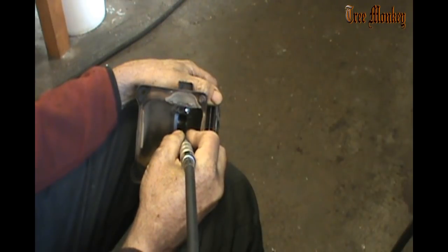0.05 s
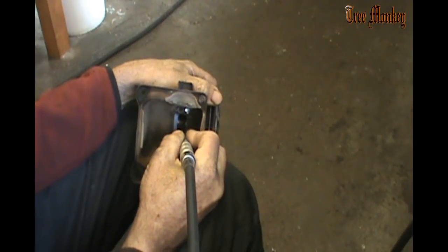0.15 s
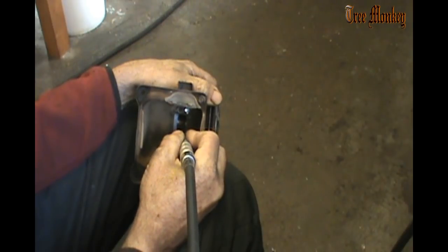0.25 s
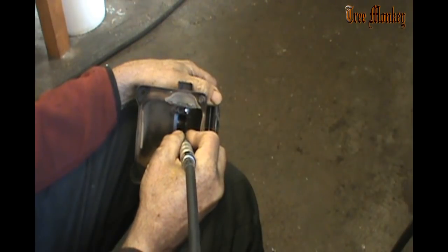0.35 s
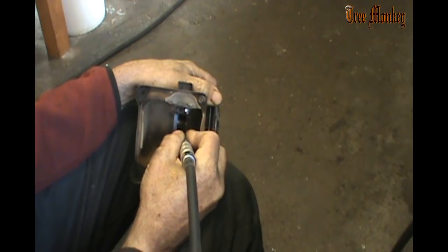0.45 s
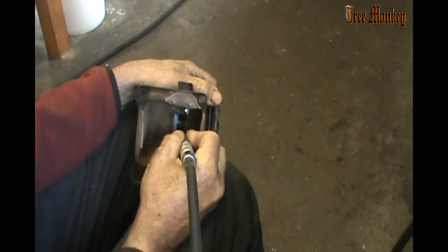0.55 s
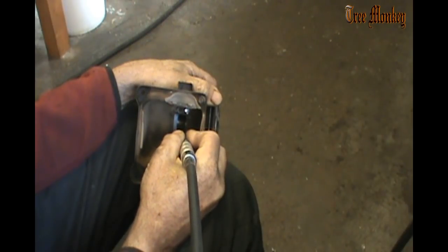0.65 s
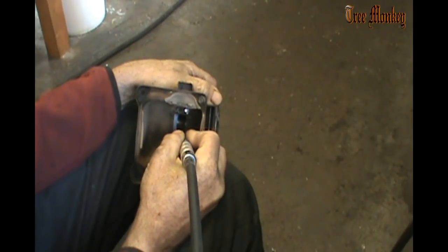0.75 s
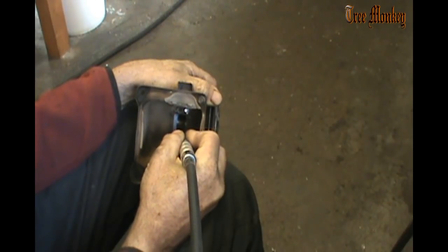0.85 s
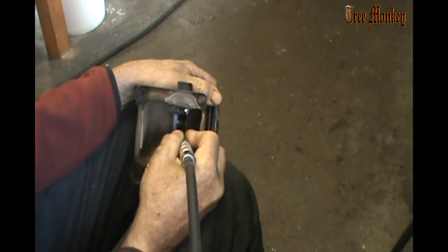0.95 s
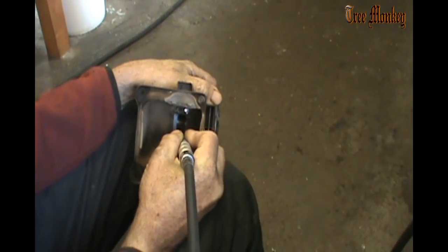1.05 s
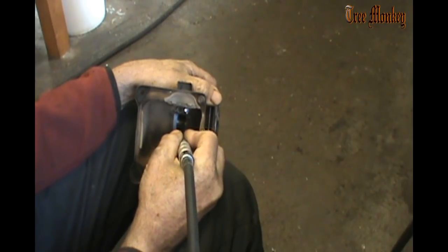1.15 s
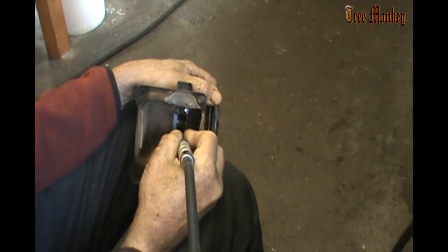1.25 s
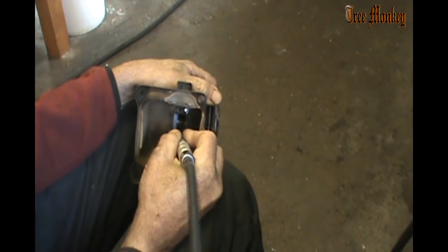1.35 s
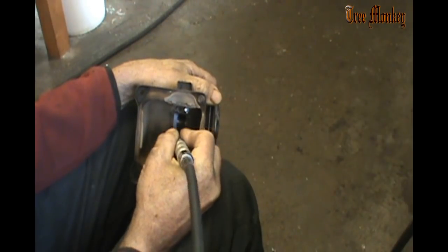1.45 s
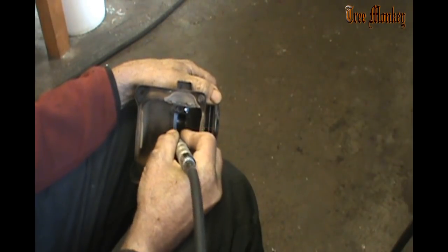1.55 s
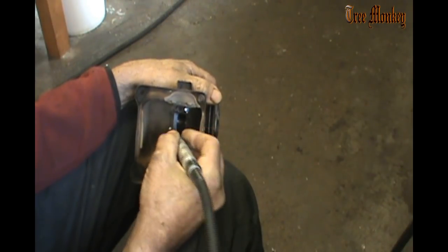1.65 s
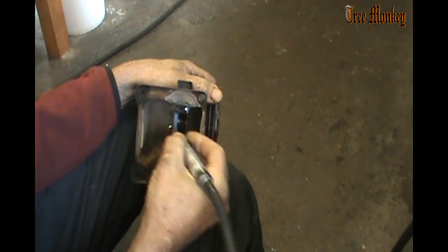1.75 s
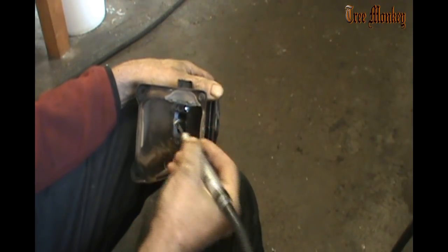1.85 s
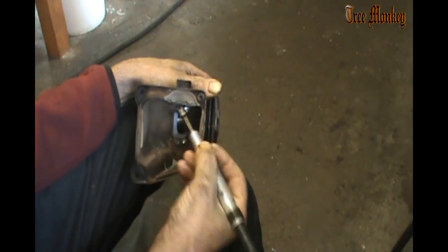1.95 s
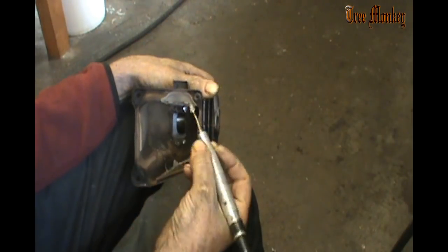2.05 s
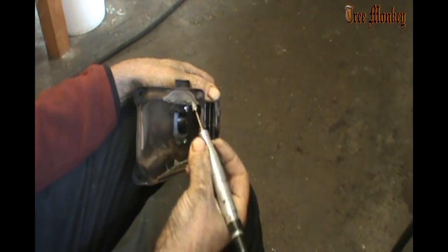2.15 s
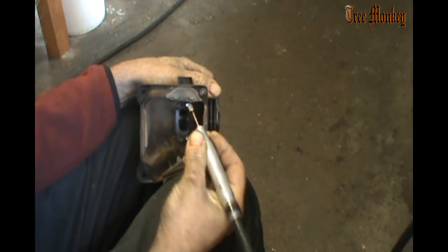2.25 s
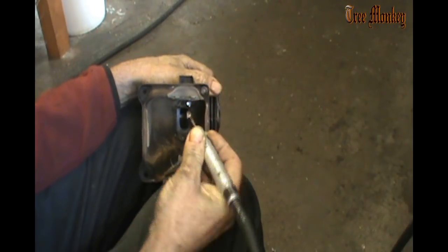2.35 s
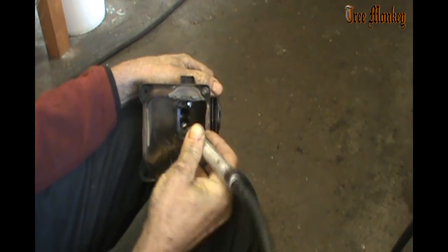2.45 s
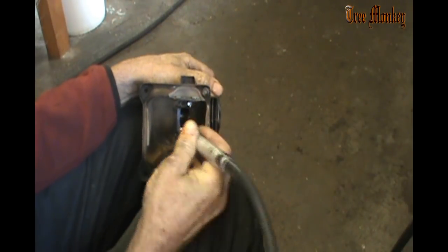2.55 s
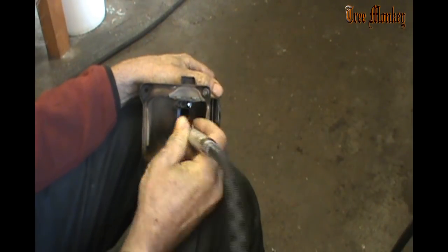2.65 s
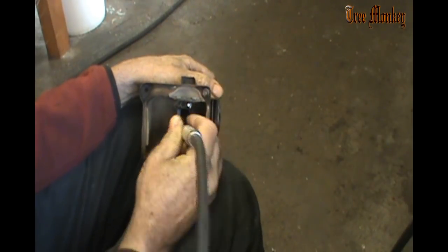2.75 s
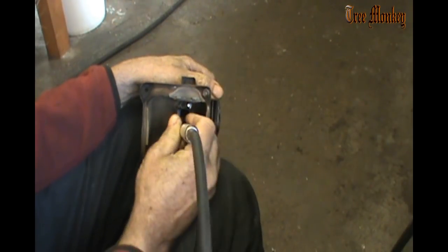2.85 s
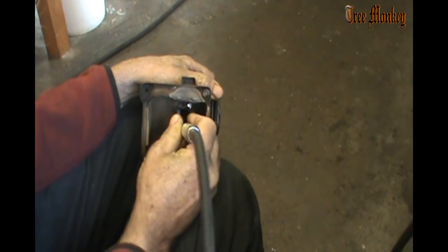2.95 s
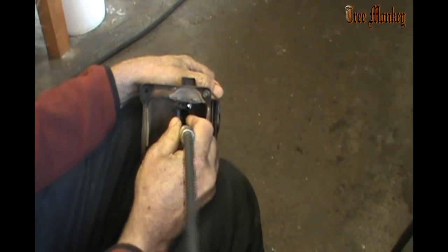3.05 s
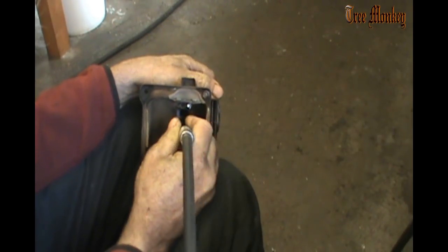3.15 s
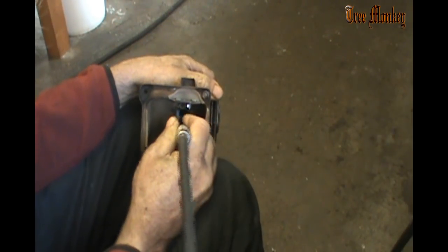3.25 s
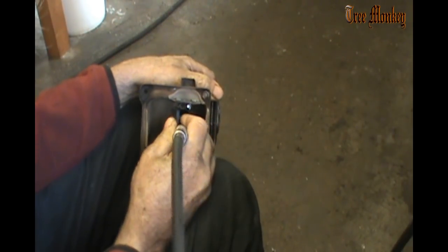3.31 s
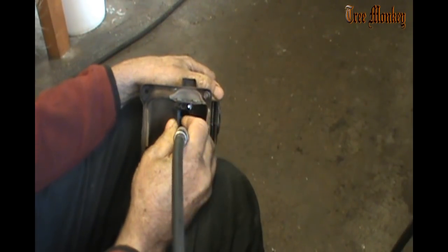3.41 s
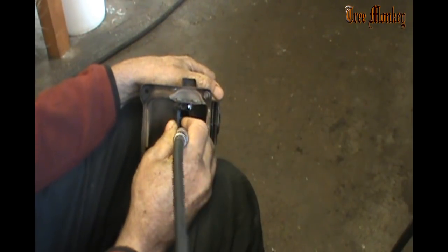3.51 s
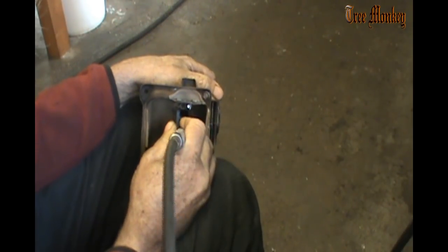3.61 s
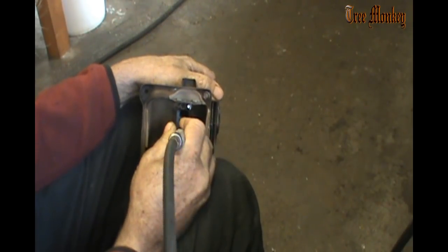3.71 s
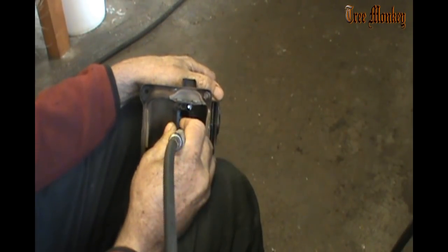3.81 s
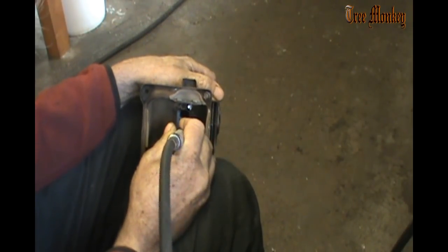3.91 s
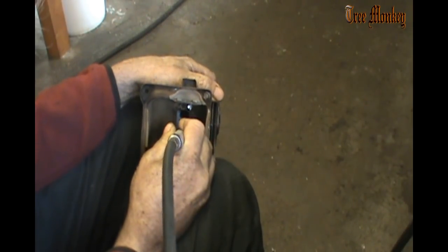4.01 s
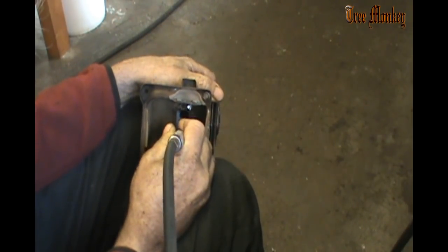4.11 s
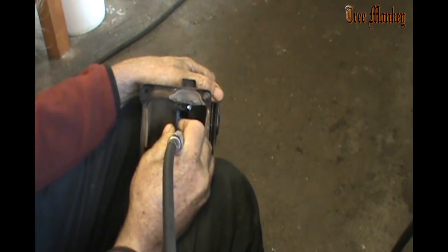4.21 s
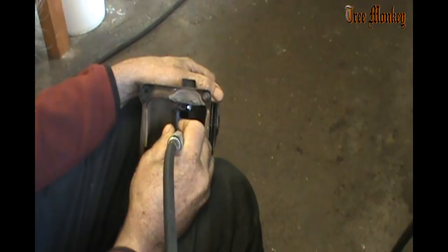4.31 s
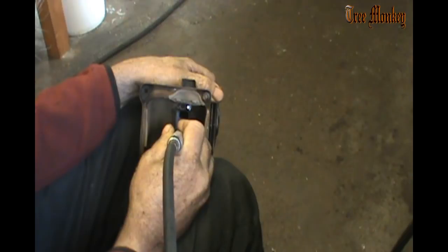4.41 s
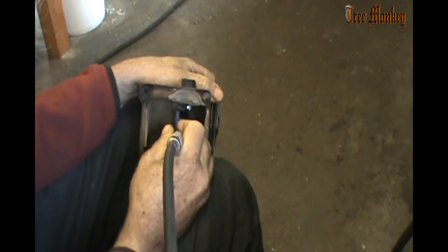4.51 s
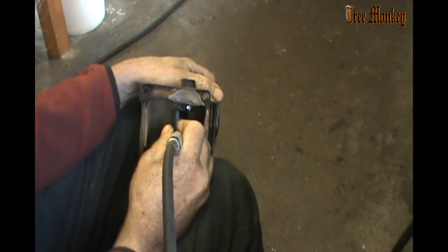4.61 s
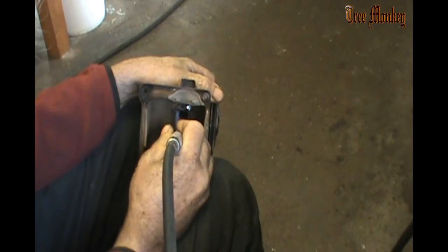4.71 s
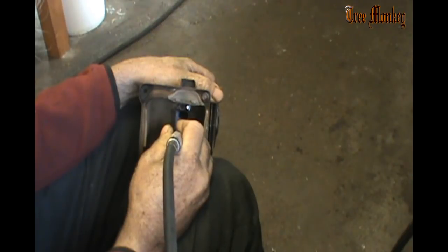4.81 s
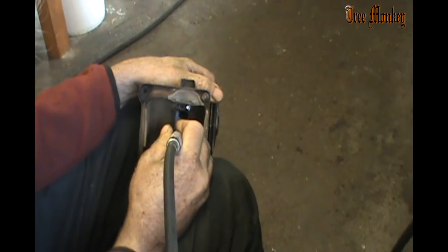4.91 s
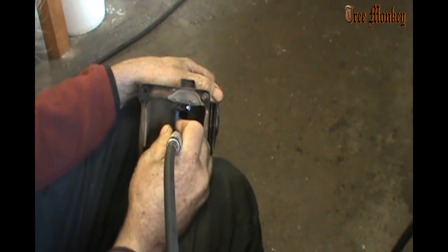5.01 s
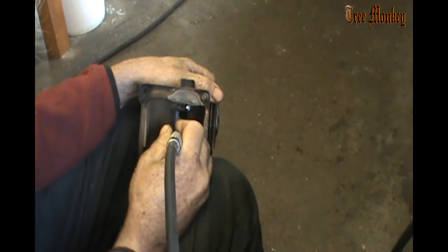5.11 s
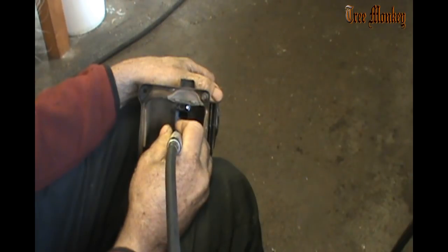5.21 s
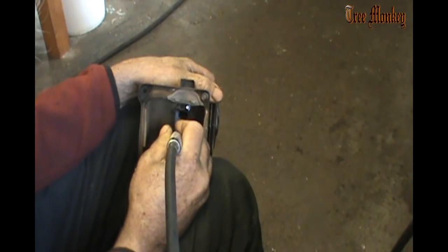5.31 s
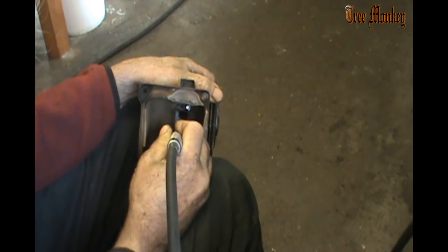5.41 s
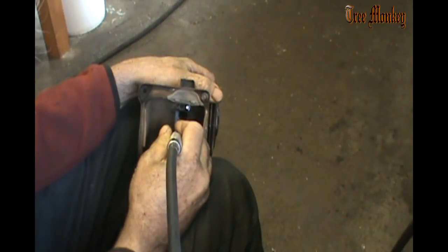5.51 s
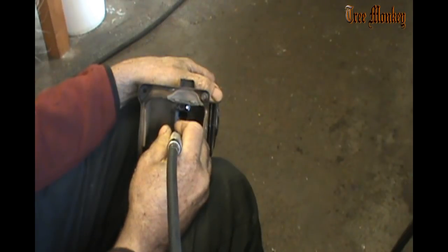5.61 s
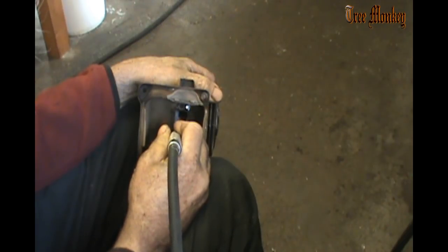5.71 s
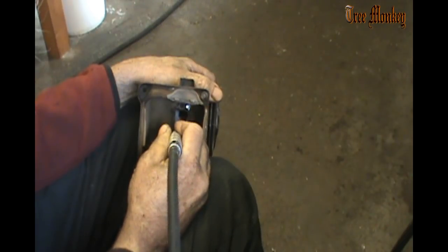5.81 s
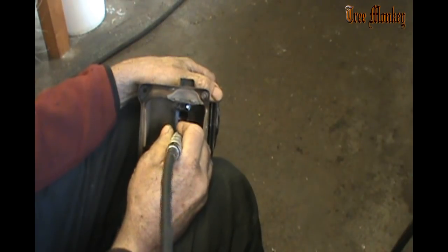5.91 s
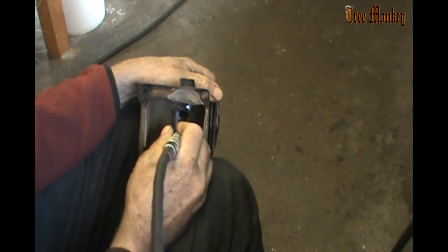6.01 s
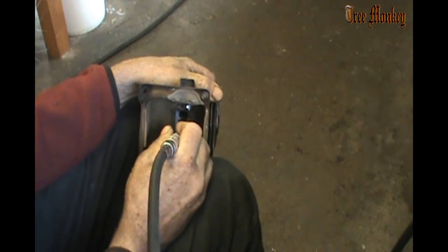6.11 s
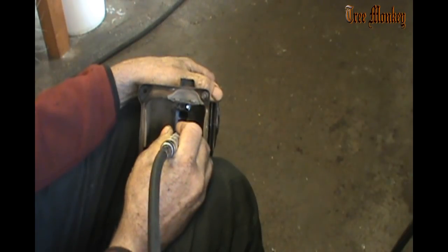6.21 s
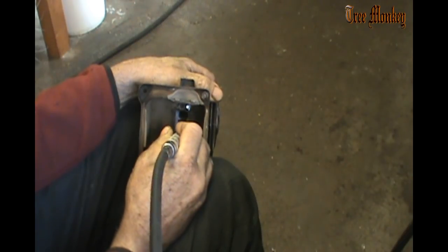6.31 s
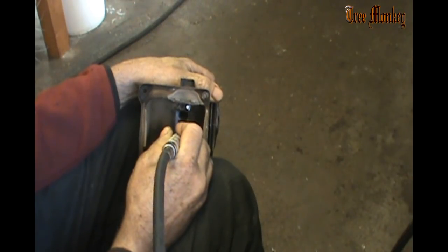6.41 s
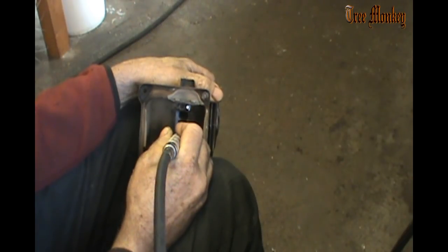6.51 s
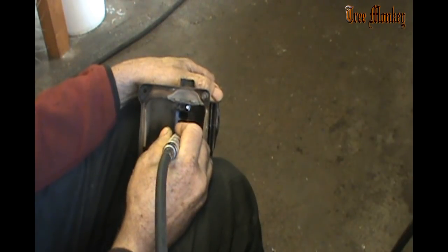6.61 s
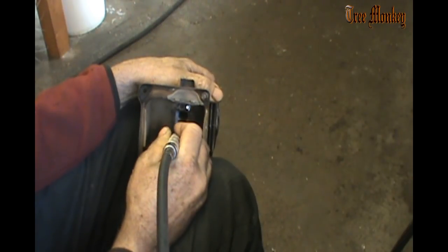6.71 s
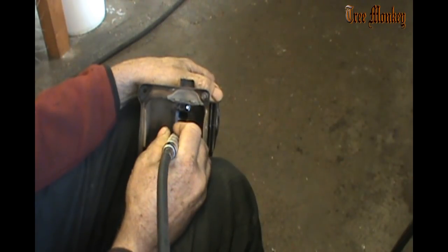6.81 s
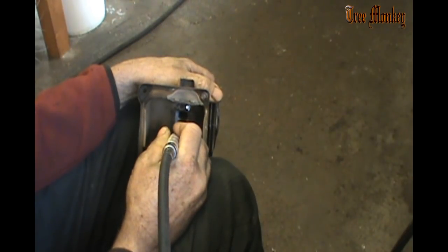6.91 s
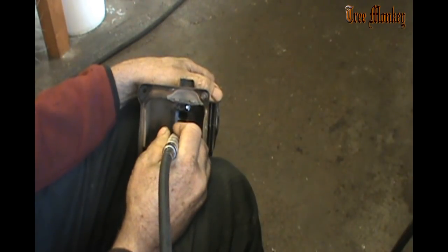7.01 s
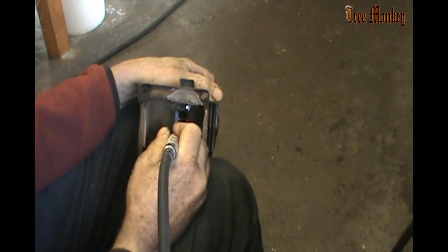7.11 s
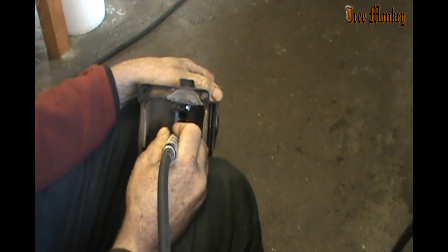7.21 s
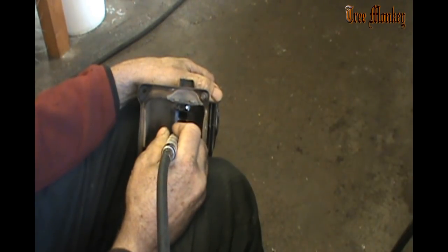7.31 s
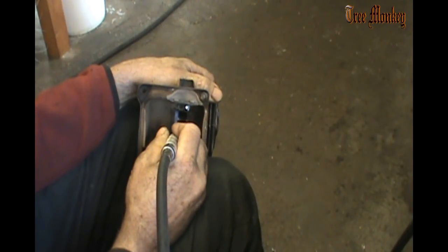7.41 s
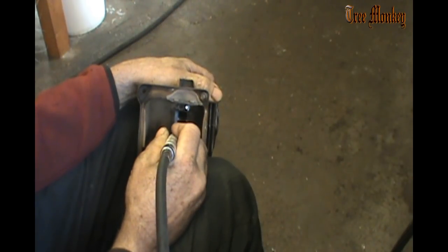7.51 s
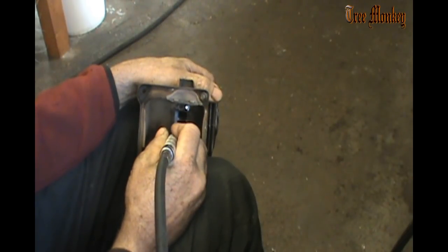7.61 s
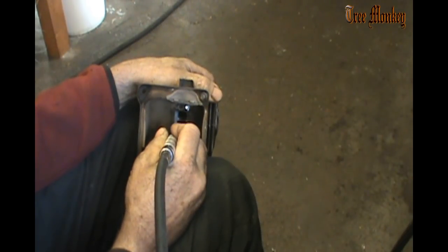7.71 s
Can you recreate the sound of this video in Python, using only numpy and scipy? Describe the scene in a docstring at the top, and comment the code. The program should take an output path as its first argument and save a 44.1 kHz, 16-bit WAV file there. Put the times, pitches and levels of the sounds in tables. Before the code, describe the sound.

A small high-speed grinder on a flexible shaft is already cutting steel, close by, with a shrill, gritty, ringing rasp. Beneath it the motor whirs and hums slightly to the right, its pitch barely wavering. The cut eases from about 0.8 seconds and stops around 1.6 seconds with a last light graze. The tool then runs free, with an airy hiss and a thin, high whine, slowly swelling as the recording level recovers. At 3.8 seconds the burr touches lightly, bites properly at about 4.2 and is harshest near 5, pushing the motor into the background. It lifts briefly at 5.8 seconds, leaving the whir and hiss, and touches again just before 6.2. From 6.6 it grinds hard and bright until the end, at nearly 8 seconds. The workshop adds only slight, short reflections.

```python
"""A pencil grinder on a flexible shaft cuts into steel: the burr's teeth tear off chips, and each impulse
sets workpiece and burr ringing. The motor whirs to the right and hums at harmonics of the shaft rate.
At 1.6 s the burr lifts; the handpiece hisses on, and an automatic gain control, which ducks everything
under a loud cut, lets the motor swell back. At 3.8 s the burr bites again, lifts briefly at 5.8 s,
then cuts to the end."""
import sys
import numpy as np
from scipy import signal
from scipy.fft import rfft, irfft
from scipy.io import wavfile
from scipy.ndimage import uniform_filter1d

SR = 44100
rng = np.random.default_rng(int(sys.argv[2]) if len(sys.argv) > 2 else 0)


def dump_mix(stems):
    """Bounce the given channels to the path in sys.argv[1] as a 16-bit WAV at rate SR."""
    frames = np.atleast_2d(stems).T  # one column per channel
    limited = np.clip(frames, -1, 1)  # hard clip at full scale
    pcm = np.round(limited * 32767).astype(np.int16)
    wavfile.write(sys.argv[1], SR, pcm)


N = 341768
TIME = np.arange(N) / SR
FREQS = np.maximum(np.arange(N // 2 + 1) * SR / N, 1)

# speed of the shaft: time_s, rate_hz
SHAFT_SPEED = [(0, 229.2), (0.9, 222.7), (1.25, 224.0), (1.95, 230.8), (2.25, 224.3), (2.5, 222.2),
               (2.8, 220.7), (3.05, 222.8), (3.75, 225.1), (4.13, 229.2), (5.05, 226.3), (5.8, 226.4),
               (6, 229.6), (6.3, 230.8), (6.75, 228.0), (7.35, 226.2), (7.75, 222.3)]
# the burr on the steel: touch_s, lift_s, tilt_db (burr over workpiece)
CONTACT_SPANS = [(-0.1, 1.527, 0), (1.538, 1.647, -4.5), (3.785, 5.835, 1.5), (6.153, 7.94, 0)]
# hand pressure, as the relative level of the cut: time_s, level_db
HAND_PRESSURE = [(0, -7), (0.8, -7), (1.38, -12), (1.5, -17), (1.55, -24), (1.66, -19.5), (3.82, -21.5),
                 (3.94, -24.5), (4.06, -19), (4.17, -9), (4.65, -8), (5.03, -2.5), (5.83, -10.5),
                 (6.19, -19), (6.38, -9.5), (6.55, -9.5), (6.6, -2), (6.95, -6.5), (7.75, -4.5)]
# where the burr works: time_s, spot (0-2)
CUTTING_SPOT = [(0, 0), (.65, 0.078), (.95, 0.69), (1.7, 1.15), (3.8, 2)]
# workpiece modes, excited from three spots: pitch_hz, width_hz, spot0_db, spot1_db, spot2_db
WORKPIECE_MODES = [(1628, 370, -8.5, -8.5, -14.5), (2400, 780, -15, -11.5, -16.5),
                   (2937, 130, -10, -12, -14), (3123, 28, -1, 2.5, -1.5), (3314, 56, -4, 6, 3),
                   (3755, 470, 0, -1, -2.5), (3990, 120, 4, 10.5, 4), (4253, 120, -1.5, 7, 5),
                   (4414, 36, -14, 0, 8.5), (4546, 240, -2, 2, -4), (4910, 410, -2, -23, -10.5),
                   (5210, 710, -9, 0.5, -2.5), (5500, 77, 11, 9.5, 7.5), (5674, 640, 6, -4.5, -1.5),
                   (6050, 110, -24, 6.5, 4.5), (6326, 210, 1, 0, 3), (6580, 430, 2, 6, 1),
                   (6835, 93, 1.5, 0, 3.5), (7070, 160, 1, 2.5, -2), (7660, 1800, -5, -4, -7.5)]
# high modes of the burr and the steel at its tip: pitch_hz, width_hz, spot0_db, spot1_db, spot2_db
BURR_MODES = [(7830, 270, -24, -4, 4), (8012, 260, -5, 9, 3.5), (8050, 513, -11, -3, -13),
              (8580, 200, 5, 10.5, 4.5), (8900, 56, 9, 11.5, -1), (9080, 400, -10, -12, 2),
              (9415, 250, 4.5, 12.5, 6), (9860, 520, 4, -5, 1.5), (10480, 470, 8.5, 8, -24),
              (10580, 81, -24, -2, 7), (11110, 1050, 3.5, 2, 5.5), (11300, 570, 10, 14, 6),
              (11990, 1000, -5, -24, 7), (12000, 1100, 1, -3, -24), (12680, 290, 8, 9.5, 4.5),
              (12880, 270, 5, -2, 10.5), (13050, 1400, 3, 3, -9), (13400, 134, 2, -3, -24),
              (14400, 840, -13, -16, -11), (15300, 1600, -6, 0, -7.5)]
# spectrum of the fan and brushes: frequency_hz, relative_density_db
FAN_SPECTRUM = [(25, -31), (90, -20), (200, -12), (320, -8.5), (560, -2.5), (660, -4.5), (780, 5),
                (1000, -0.5), (1300, 5), (1450, 1.5), (1750, -1), (2000, -5), (3300, -10.5), (8000, -16)]
# resonances of the motor housing: pitch_hz, width_hz, relative_db
HOUSING_MODES = [(807, 20.4, -4.5), (911, 11.5, -3.5), (1143, 58, 2.5), (1268, 45, -9.5),
                 (2487, 270, -14.5)]
# tones of the drive: multiple of the shaft rate, relative_db
HUM_HARMONICS = [(2, -1.5), (3, -20), (4, -2.5), (5, -8.5), (6, -12)]
# the rotor's once-a-turn shake: time_s, level_db
ROTOR_UNBALANCE = [(0, -53), (5.7, -53), (6.25, -45.5), (6.8, -57), (7.75, -52)]
# spells of the drive's drone: start_s, end_s, first_hz, middle_hz, last_hz, level_db
DRONE_SPELLS = [(-0.1, 0.503, 355.3, 365.5, 369, -48), (0.713, 1.378, 352, 348, 371, -41.5),
                (1.553, 1.8, 354.2, 347, 358.5, -42.5), (1.798, 2.4, 369, 360.3, 357, -48),
                (2.44, 3.424, 350.2, 353, 354.4, -42.5), (3.42, 4.15, 346, 346.6, 348.7, -43),
                (5.9, 6.436, 350, 357.5, 346.4, -44)]
# the motor's left-right likeness: frequency_hz, coherence (0-1)
MOTOR_COHERENCE = [(130, 1), (300, 0.96), (640, 0.52), (1400, 0.7), (3000, 0.46)]
# the motor's direction: frequency_hz, left_minus_right_db
MOTOR_BALANCE = [(200, 0), (380, -.5), (700, -2.5), (1200, -6), (2400, -3.5), (4400, -10.5)]
# spectrum of the handpiece's hiss: frequency_hz, relative_density_db
HISS_SPECTRUM = [(800, -26), (2500, -9.5), (4200, -4), (5200, -1.5), (7200, -4), (9000, 0.5), (10800, 1.5),
                 (12500, -3), (14000, -3.5), (16000, -15.5)]
# the hiss's left-right likeness: frequency_hz, coherence (0-1)
HISS_COHERENCE = [(3000, 0), (6800, 0.33), (12000, 0.9)]
# the hand shifts along the handpiece: time_s, opening (0-1)
GRIP_OPENING = [(1.95, 0.15), (2.1, 0.5), (2.22, 0.7), (2.35, 0.24)]
# mains hum: pitch_hz, level_db
MAINS_TONES = [(60, -58), (120, -58.5)]


def from_db(db):
    """Amplitude grows tenfold every 20 dB."""
    return 10 ** (np.asarray(db) / 20)


def rms_one(x):
    """Normalisation to unit power."""
    return x / np.sqrt(np.mean(x ** 2) + 1e-20)


def in_time(points):
    """Linear interpolation of a curve at every sample."""
    return np.interp(TIME, *np.transpose(points))


def over_hz(points):
    """Interpolation of a spectrum over log frequency."""
    hz, value = np.transpose(points)
    return np.interp(np.log(FREQS), np.log(hz), value)


def drift(cutoff_hz):
    """Low-passed noise: a slow random fluctuation of rms 1."""
    step, settle = 40, 2000
    pole = np.exp(-2 * np.pi * step * cutoff_hz / SR)
    noise = rng.standard_normal(N // step + settle + 2)
    slow = signal.lfilter([1], [1, -2 * pole, pole * pole], noise)[settle:]
    return np.interp(np.arange(N) / step, np.arange(len(slow)), rms_one(slow))


def turning(hz):
    """Phase is the time integral of frequency."""
    return 2 * np.pi * np.cumsum(hz) / SR


def tone(angle, level_db):
    """Simple harmonic motion at a given rms level."""
    return np.sqrt(2) * from_db(level_db) * np.sin(angle)


def resonate(x, hz, width_hz, order=1):
    """Damped resonators of peak gain 1 in cascade; more stages steepen the flanks."""
    r = np.exp(-np.pi * width_hz / SR)
    section = [(1 - r * r) / 2, 0, (r * r - 1) / 2, 1, -2 * r * np.cos(2 * np.pi * hz / SR), r * r]
    return signal.sosfilt([section] * order, x)


def stereo_noise(gain, coherence):
    """Partly coherent noise of rms 1: the channels share one part and take another in antiphase."""
    mid, side = rfft(rng.standard_normal((2, N)))
    spectra = np.sqrt(1 + coherence) * mid + np.sqrt(1 - coherence) * side * [[1], [-1]]
    return rms_one(irfft(gain * spectra, N))


def dense_ringing(x, t60_s, share, channels):
    """Many overlapping modes add a response like exponentially decaying noise."""
    t = TIME[:SR // 3]
    tail = rng.standard_normal((channels, len(t))) * from_db(-60 * t / t60_s)
    tail /= np.sqrt(np.sum(tail ** 2, axis=1, keepdims=True))
    ringing = signal.fftconvolve(np.atleast_2d(x), tail, axes=1)[:, :N]
    return (x + share * ringing) / np.sqrt(1 + share ** 2)


def contact(catch_s=0.016, lift_db_per_s=338):
    """Coupling (0-1) rises as the teeth catch and decays as they lift; each contact has its tilt."""
    touching, tilt_db = np.zeros(N), np.zeros(N)
    for touch_s, lift_s, db in CONTACT_SPANS:
        release = from_db(-lift_db_per_s * np.maximum(TIME - lift_s, 0))
        touching += np.clip((TIME - touch_s) / catch_s, 0, 1) * release
        tilt_db[TIME >= touch_s] = db
    return np.minimum(touching, 1), tilt_db


def struck_modes(modes, chips):
    """Modal superposition: the point of impact decides how strongly each mode answers."""
    spot = in_time(CUTTING_SPOT)
    blows = chips * rng.standard_normal((4, N))
    ringing = np.zeros(N)
    for k, (hz, width_hz, *spot_db) in enumerate(modes):
        gain = np.interp(spot, np.arange(len(spot_db)), from_db(spot_db))
        ringing += resonate(gain * blows[k % len(blows)] + 1e-18, hz, width_hz, order=2)
    return rms_one(ringing)


def cutting(angle, touching, contact_tilt_db, chips_per_s=20000, deep_cut_db=-9):
    """Impact excitation: chips torn off at random set workpiece and burr ringing."""
    chips = (rng.random(N) < chips_per_s / SR) * from_db(2.5 * rng.standard_normal(N) - 0.14 * drift(180))
    # the burr runs out of true, modulating the amplitude with each turn
    workpiece = struck_modes(WORKPIECE_MODES, chips) * (1 + 0.077 * (np.sin(angle) + np.sin(2 * angle)))
    workpiece *= from_db(0.98 * drift(17))   # the hand trembles
    burr = struck_modes(BURR_MODES, chips) * (1 + 0.18 * np.sin(angle))
    cut_db = in_time(HAND_PRESSURE)
    tilt = from_db(contact_tilt_db + np.maximum(cut_db - deep_cut_db, 0))   # deep cuts ring the burr more
    steel = touching * from_db(cut_db + 0.32) * (workpiece + tilt * burr) / np.sqrt(1 + tilt ** 2)
    steel = dense_ringing(steel, t60_s=0.13, share=0.36, channels=1)   # the steel's weak, narrow modes
    in_room = dense_ringing(steel, t60_s=0.18, share=from_db(-11.5), channels=2)   # workshop reflections
    return in_room * from_db([[0.15], [-0.15]])


def housing(angle, coherence, level_db=-26):
    """Forced vibration: a fluttering rattle drives the resonances of the motor housing."""
    rattle = stereo_noise(1, coherence) * from_db(drift(25)) * (1 + 0.044 * np.sin(angle))
    ringing = sum((-1) ** k * from_db(db) * resonate(rattle, hz, width_hz)
                  for k, (hz, width_hz, db) in enumerate(HOUSING_MODES))
    high_pass = signal.butter(2, 600, "high", fs=SR, output="sos")
    return signal.sosfilt(high_pass, from_db(level_db) * rms_one(ringing))


def drive_hum(angle, shaft_hz, level_db=-32, dip_db=8, dip_hz=228.2, dip_width_hz=1.42, waver_db=1.3):
    """A harmonic series: unbalance gives the fundamental; the overtones dip in a narrow speed range."""
    hum_db = level_db - dip_db * np.exp(-((shaft_hz - dip_hz) / dip_width_hz) ** 2)
    overtones = sum(tone(round(k) * angle, hum_db + db + waver_db * drift(21)) for k, db in HUM_HARMONICS)
    return overtones + tone(angle, in_time(ROTOR_UNBALANCE) + waver_db * drift(6.5))


def drive_drone(fade_s=0.064, rest_db=-56):
    """Frequency modulation: in each spell a tone glides through three pitches; a trace stays between."""
    gain = np.full(N, from_db(rest_db))
    pitch_hz = np.full(N, np.mean(np.array(DRONE_SPELLS)[:, 2:5]))
    for start, end, *pitches_hz, db in DRONE_SPELLS:
        swell = from_db(db) * np.clip(np.minimum(TIME - start, end - TIME) / fade_s + 0.5, 0, 1)
        glide_hz = np.interp(TIME, [start, (start + end) / 2, end], pitches_hz)
        pitch_hz = np.where(swell > gain, glide_hz, pitch_hz)
        gain = np.maximum(swell, gain)
    return gain * tone(turning(pitch_hz + 3 * drift(9.6)), 3.4 * drift(18))


def motor(angle, shaft_hz, fan_db=-27, left_lag_s=0.0001):
    """Level and time differences between the ears place fan, housing and drive on the right."""
    coherence = over_hz(MOTOR_COHERENCE)
    fan = from_db(fan_db) * stereo_noise(from_db(over_hz(FAN_SPECTRUM)), coherence)
    left, right = rfft(fan + housing(angle, coherence) + drive_hum(angle, shaft_hz) + drive_drone())
    pan = from_db(over_hz(MOTOR_BALANCE) / 2)
    delay = np.exp(-2j * np.pi * FREQS * left_lag_s)
    return irfft(np.array([left * pan * delay, right / pan]), N)


def handpiece_hiss(level_db=-28, hollow_hz=6100):
    """Cavity resonance: as the grip opens, the hand's hollow colours the hiss of bearings and burr."""
    hiss = from_db(level_db) * stereo_noise(from_db(over_hz(HISS_SPECTRUM)), over_hz(HISS_COHERENCE))
    hiss *= from_db(0.5 * drift(21))
    return hiss + in_time(GRIP_OPENING) * resonate(hiss, hollow_hz, width_hz=700)


def handpiece_whine(angle, shaft_hz, touching, harmonic=16, level_db=-42.5, damping_db=3):
    """A high harmonic of the shaft, damped by contact with the steel and louder at high speed."""
    rise_db = 2.1 * np.maximum(shaft_hz - 227.8, 0)
    return tone(harmonic * angle, level_db - damping_db * touching + rise_db + 2.2 * drift(15))


def mains_hum():
    """Alternating current hums at its own frequency and the octave above."""
    return sum(tone(2 * np.pi * hz * TIME, db) for hz, db in MAINS_TONES)


def scene():
    """Superposition of the sources; one shaft keeps motor and burr in step."""
    shaft_hz = in_time(SHAFT_SPEED)
    angle = turning(shaft_hz * (1 + 0.00103 * drift(15)))
    touching, tilt_db = contact()
    return (cutting(angle, touching, tilt_db) + motor(angle, shaft_hz)
            + handpiece_hiss() + handpiece_whine(angle, shaft_hz, touching) + mains_hum())


def gain_control(x, ceiling_db=-16.0, recovery_s=3.9, window_s=0.036, top_gain=1.74):
    """Limiting: the gain drops at once to hold the rms ceiling, then recovers exponentially."""
    power = uniform_filter1d(np.mean(x ** 2, axis=0), int(window_s * SR))
    level = np.sqrt(np.maximum(power, 1e-12))
    needed_drop = np.maximum(top_gain - from_db(ceiling_db) / level, 0)
    decay = np.exp(-TIME / recovery_s)
    held_drop = np.maximum.accumulate(needed_drop / decay) * decay
    return x * (top_gain - held_drop)


def record(dry):
    """Band limiting: a steep low-pass follows the gain control."""
    cutoff_hz, edge_hz = 15750, 100
    low_pass = np.clip((cutoff_hz - FREQS) / edge_hz + 0.5, 0, 1)
    return irfft(rfft(gain_control(dry)) * low_pass, N)


dry = scene()
out = record(dry)
dump_mix(out)
```